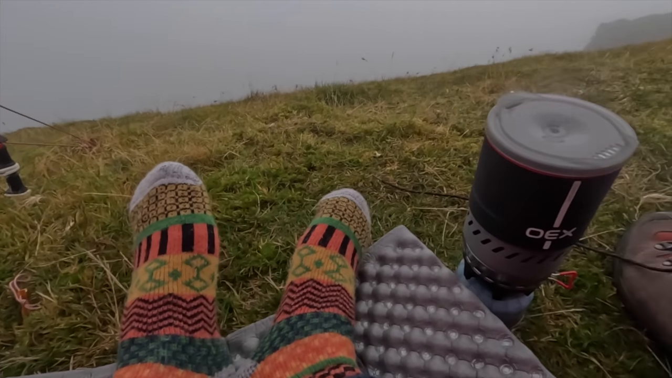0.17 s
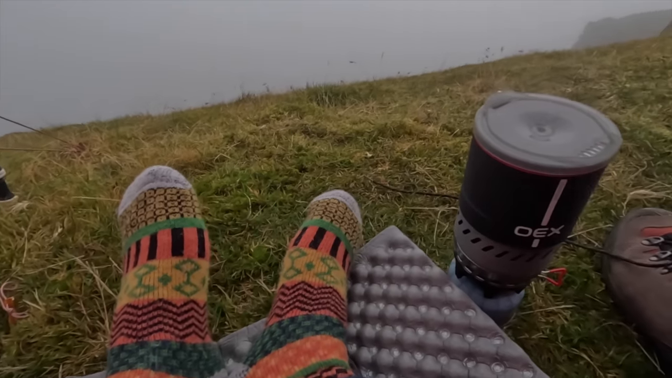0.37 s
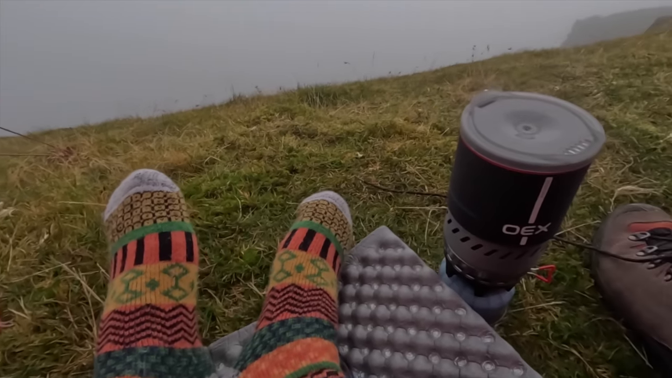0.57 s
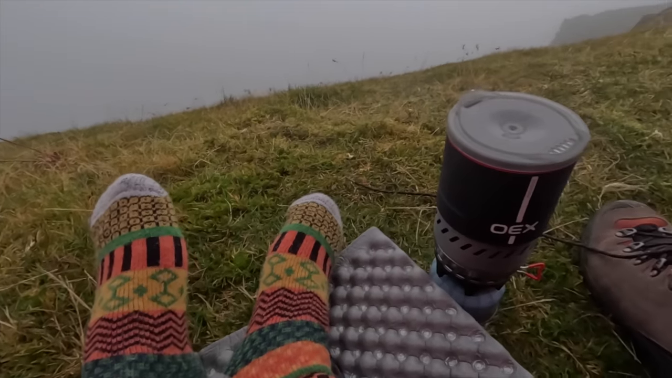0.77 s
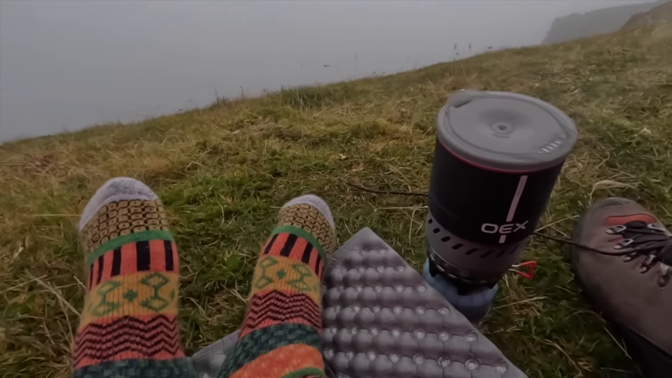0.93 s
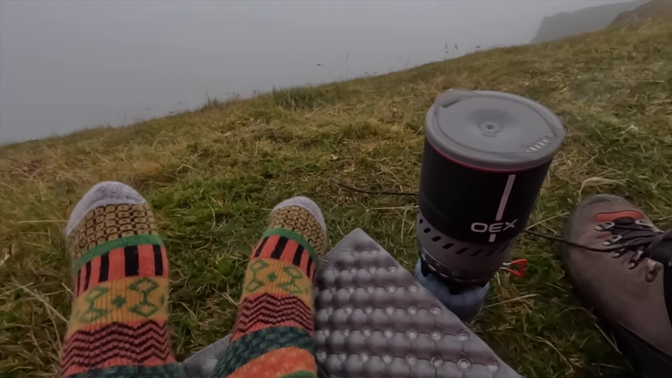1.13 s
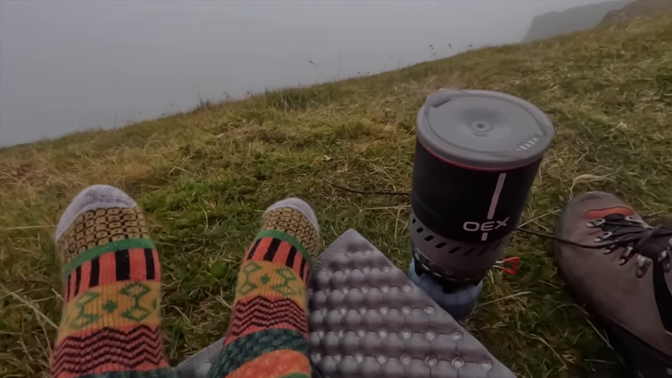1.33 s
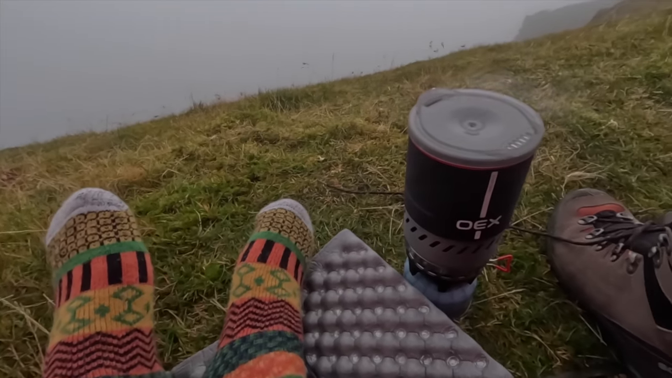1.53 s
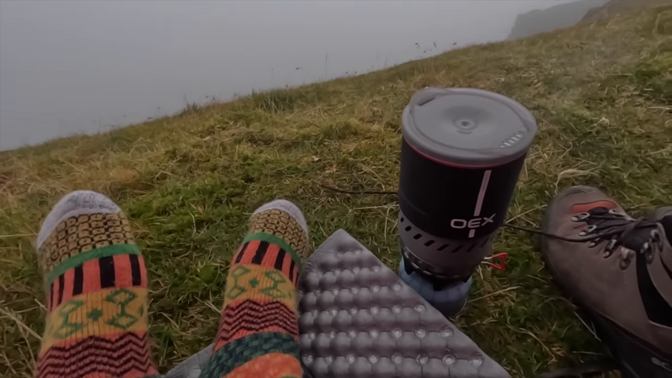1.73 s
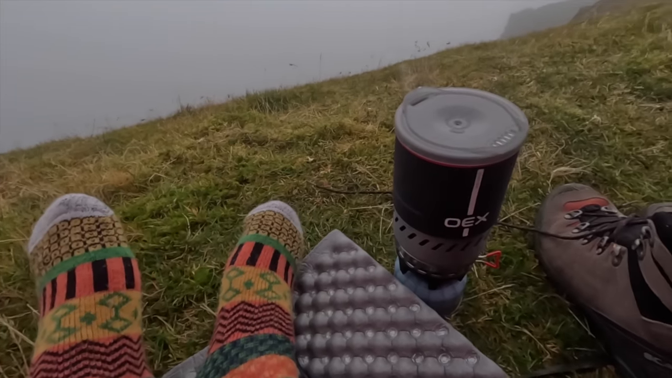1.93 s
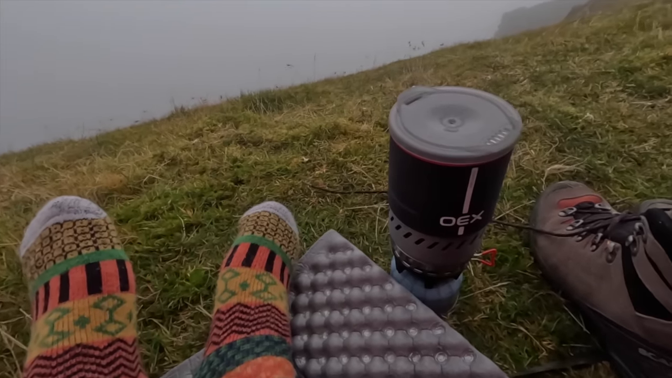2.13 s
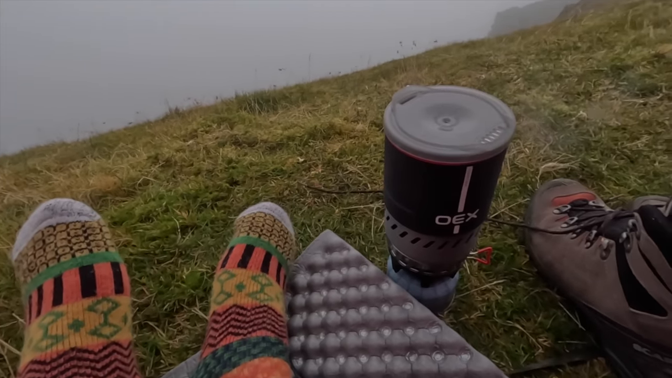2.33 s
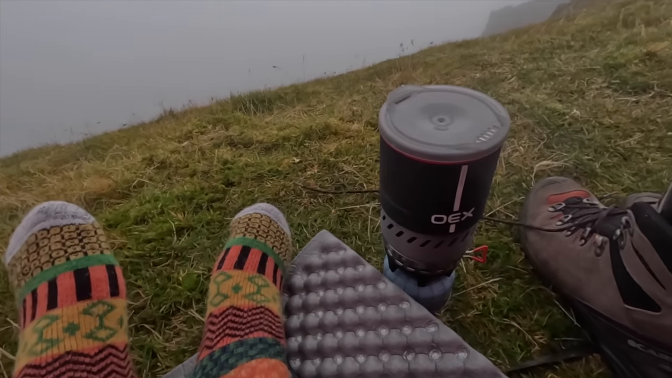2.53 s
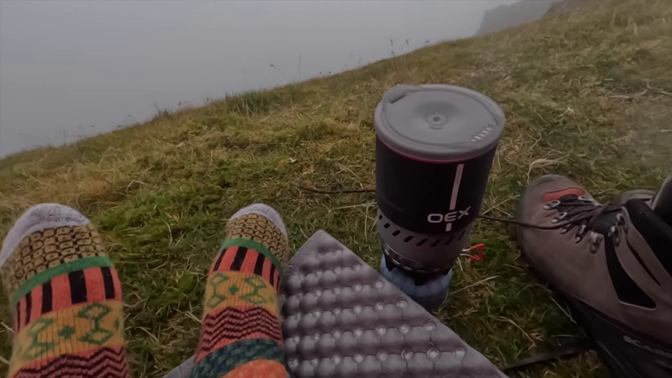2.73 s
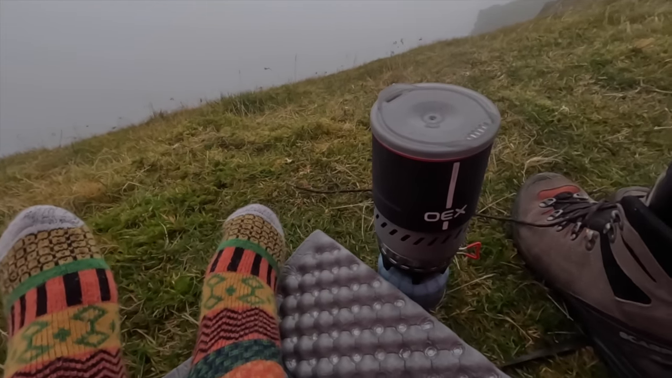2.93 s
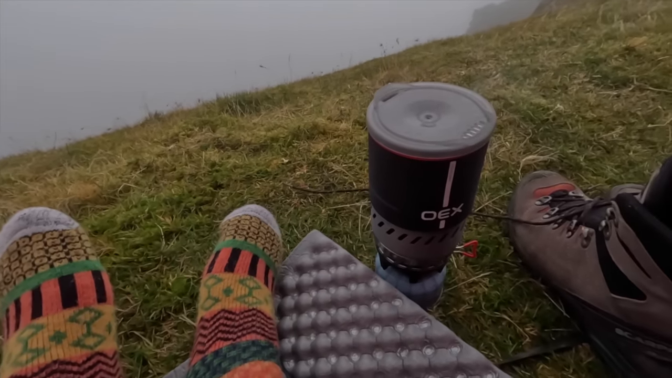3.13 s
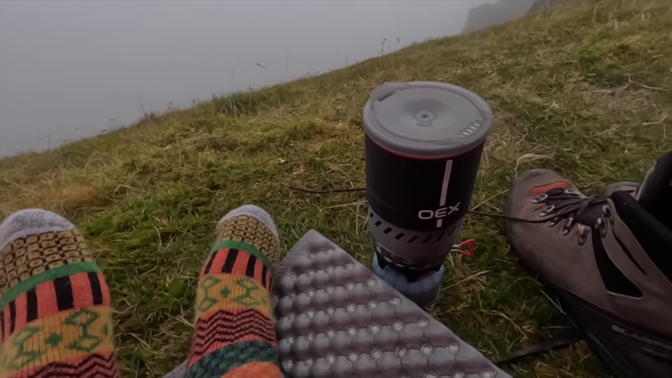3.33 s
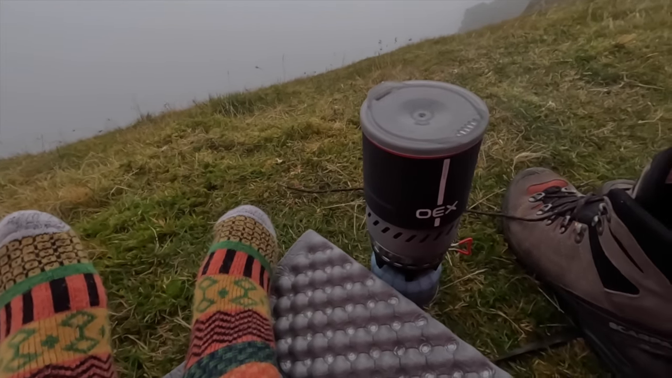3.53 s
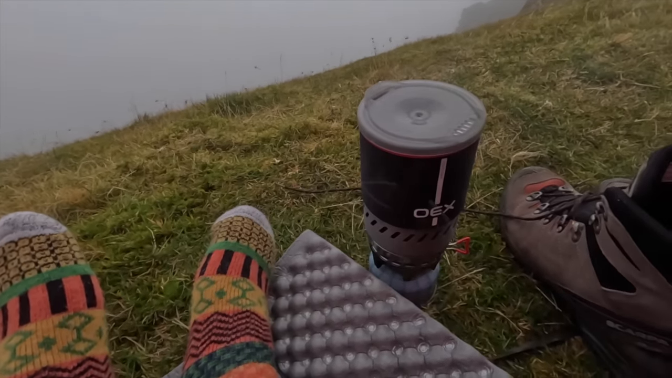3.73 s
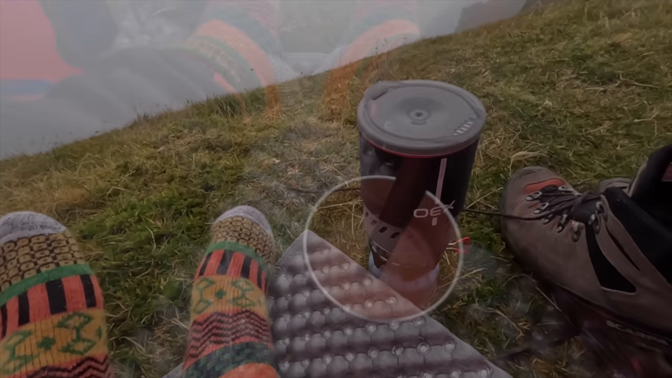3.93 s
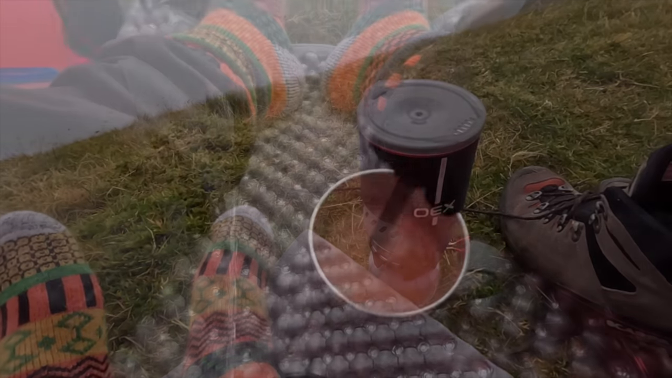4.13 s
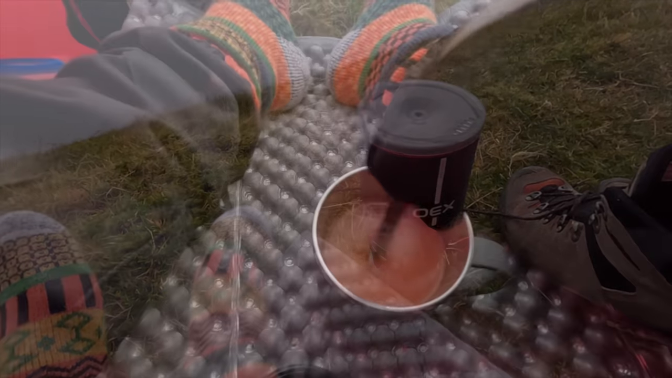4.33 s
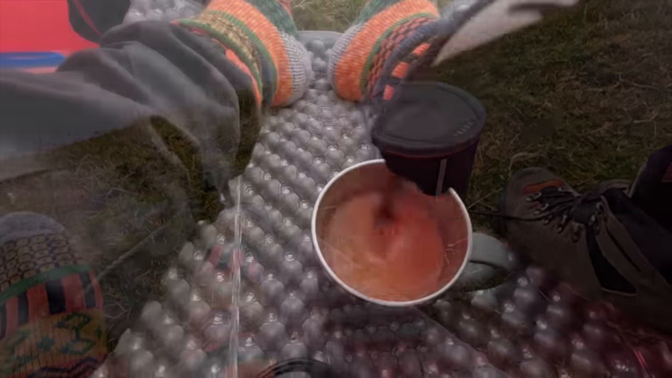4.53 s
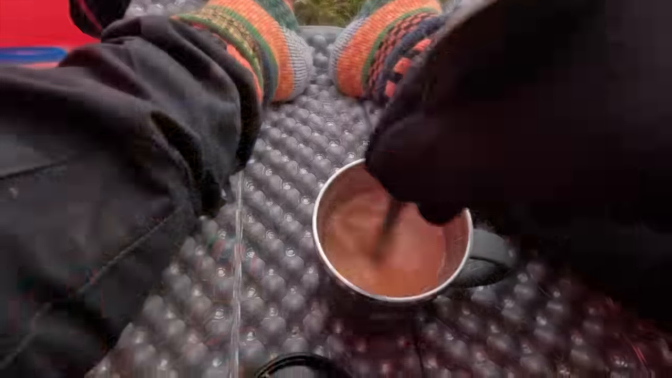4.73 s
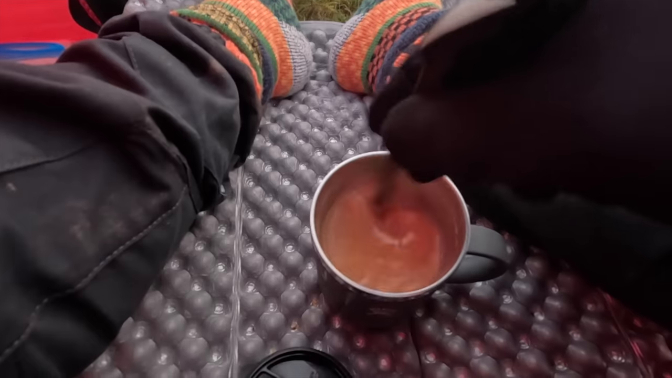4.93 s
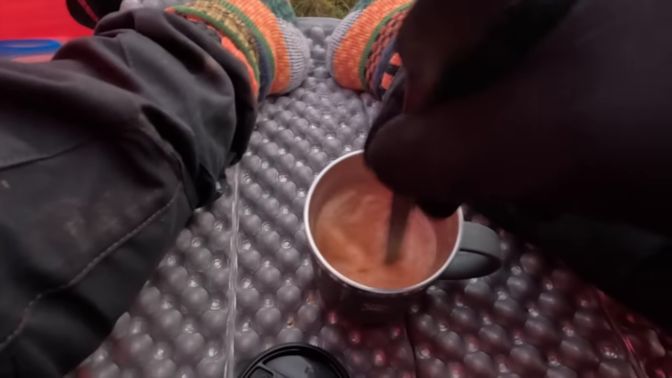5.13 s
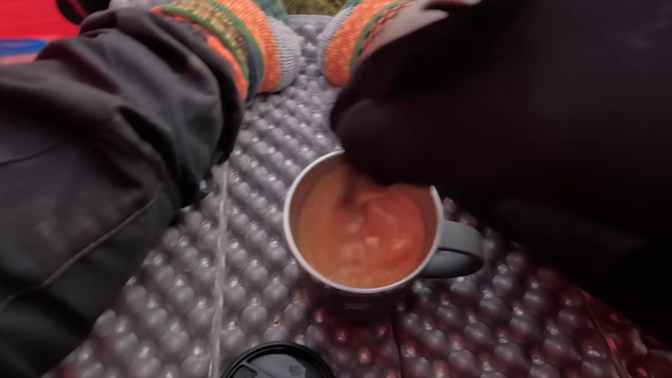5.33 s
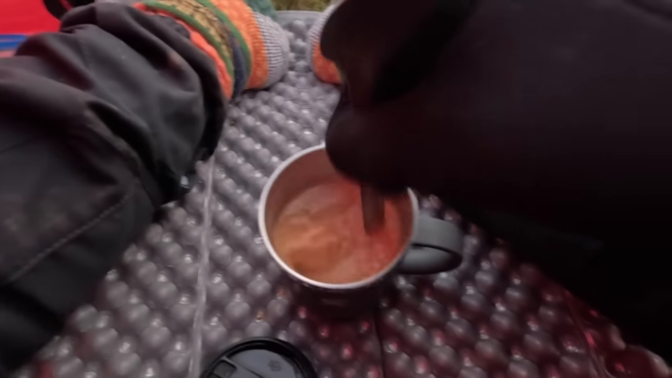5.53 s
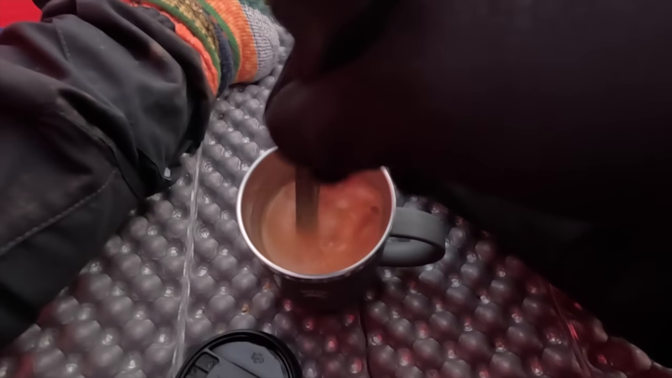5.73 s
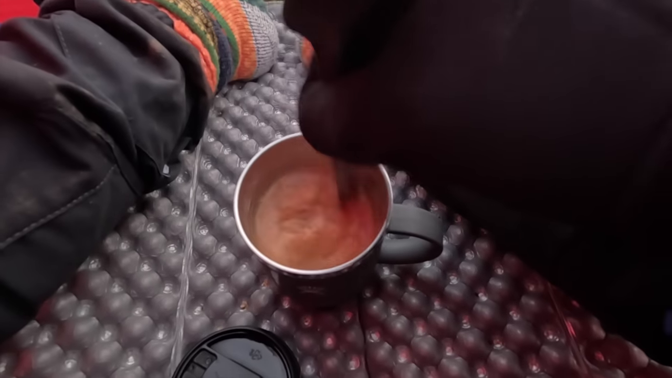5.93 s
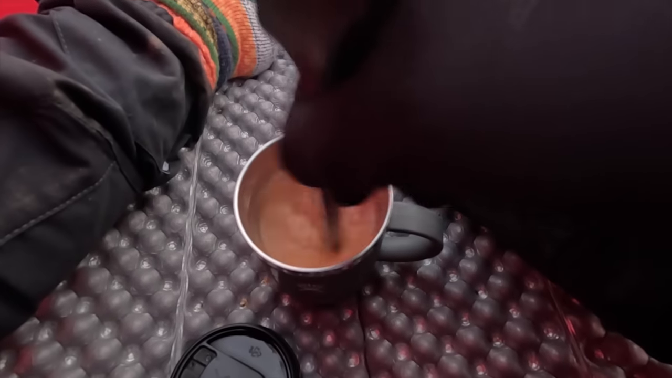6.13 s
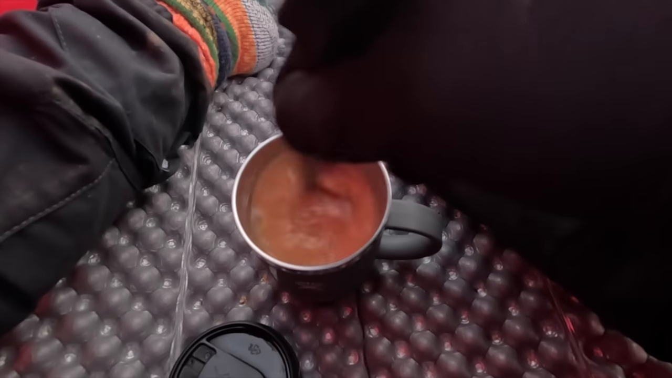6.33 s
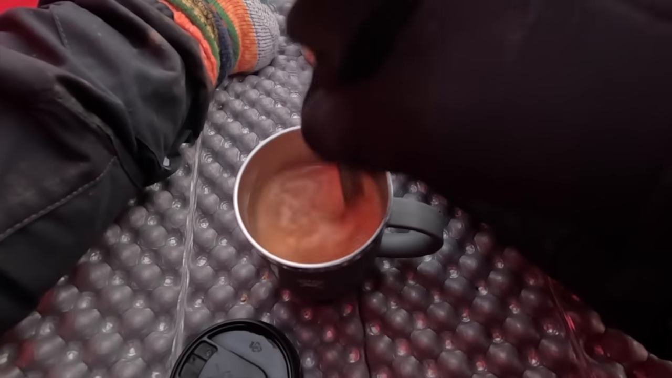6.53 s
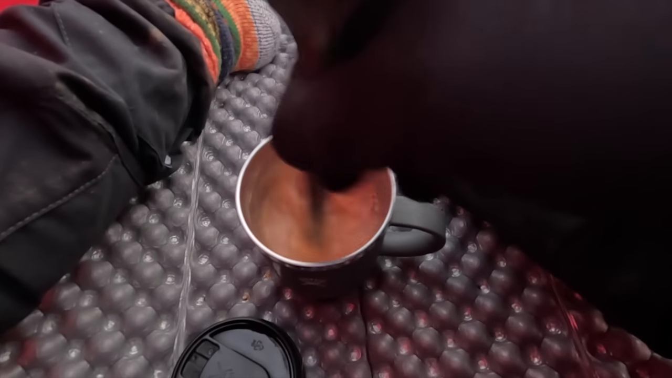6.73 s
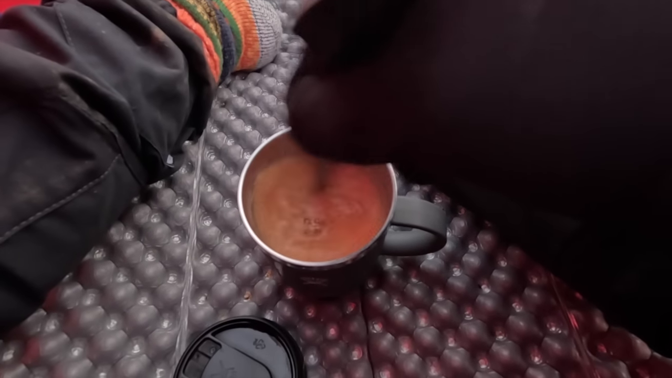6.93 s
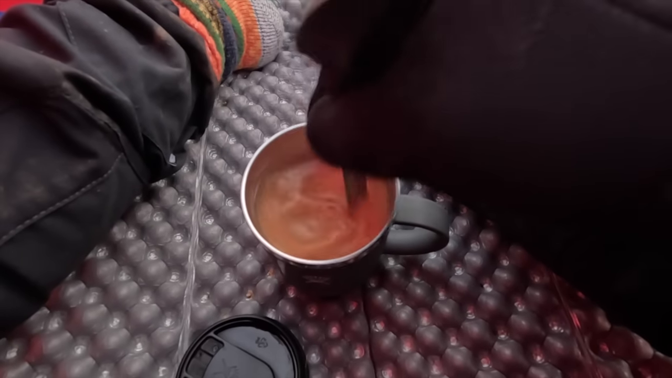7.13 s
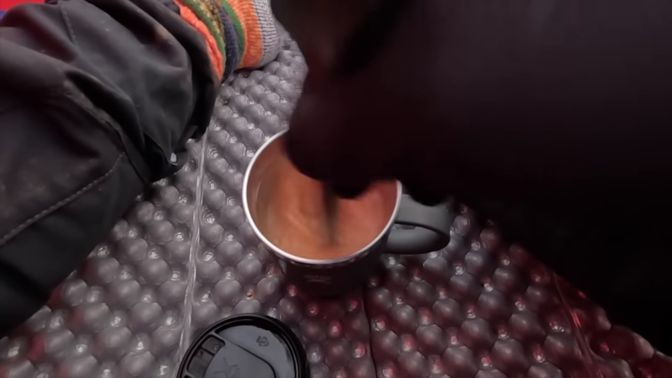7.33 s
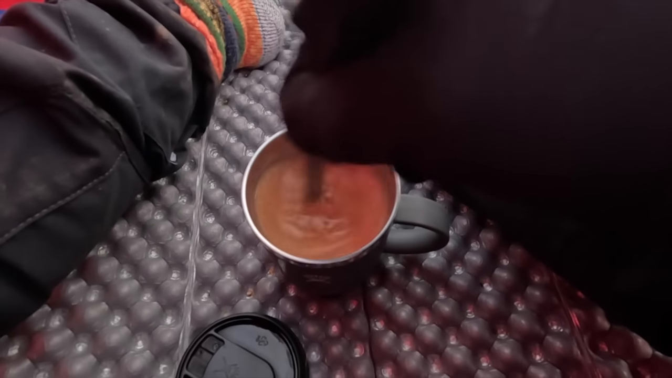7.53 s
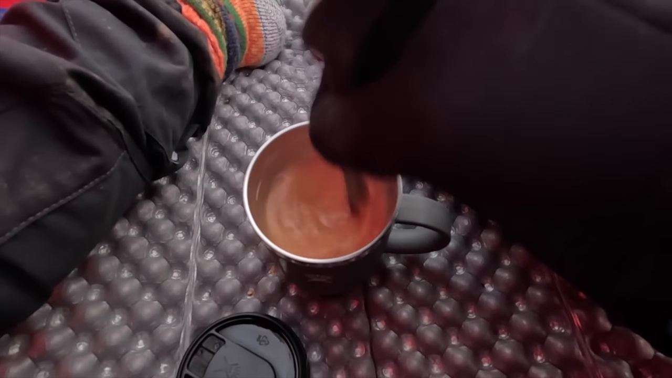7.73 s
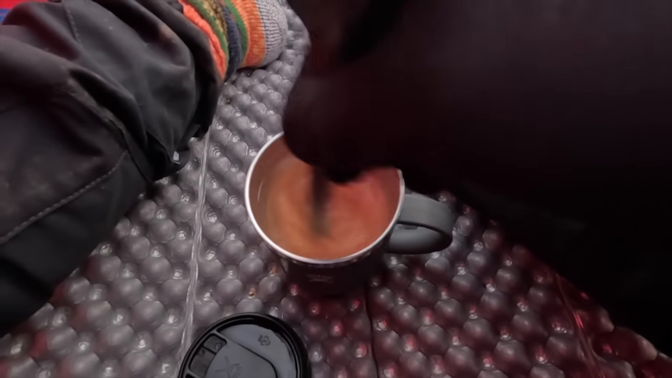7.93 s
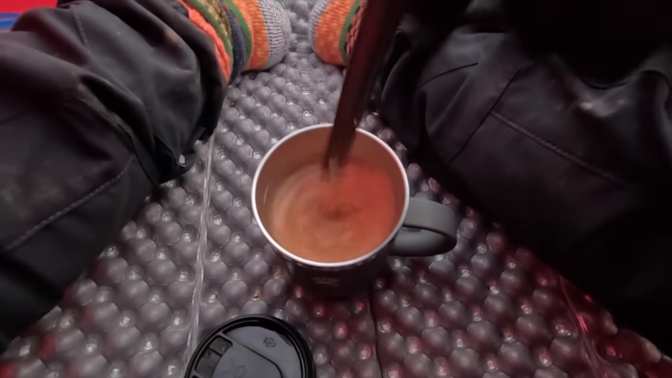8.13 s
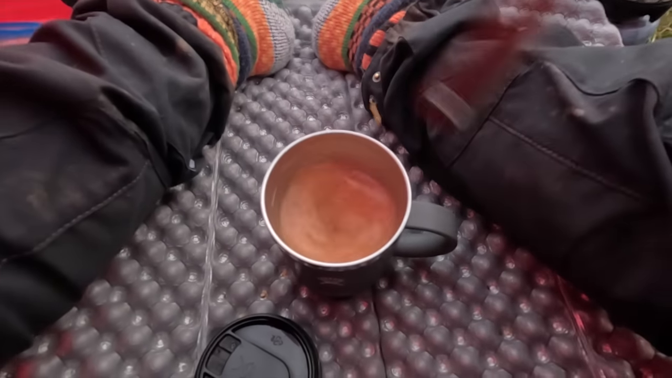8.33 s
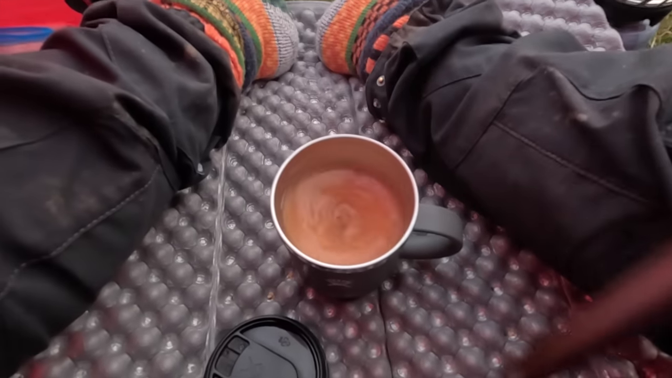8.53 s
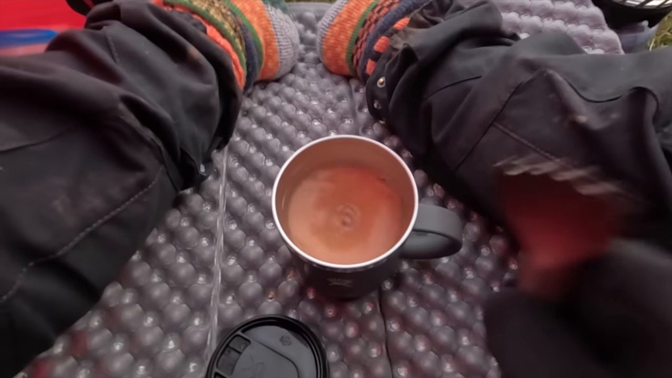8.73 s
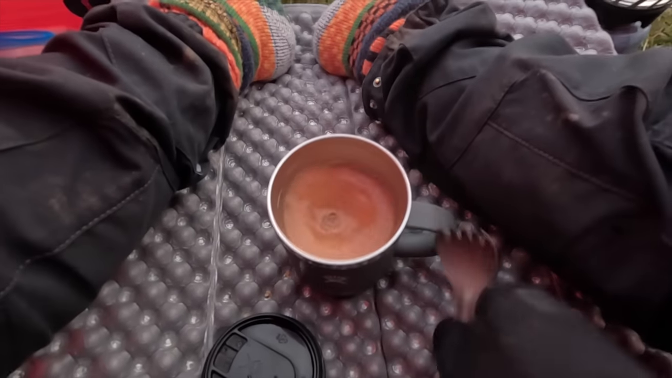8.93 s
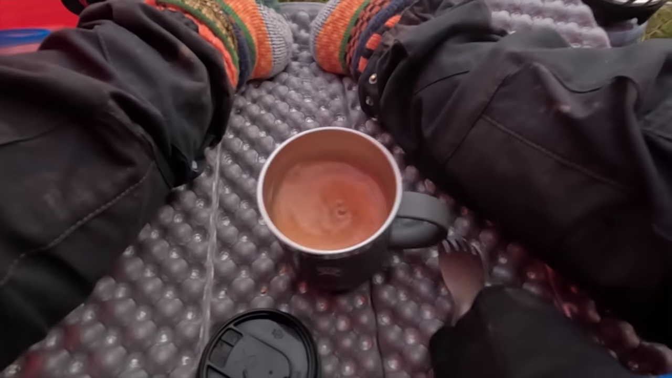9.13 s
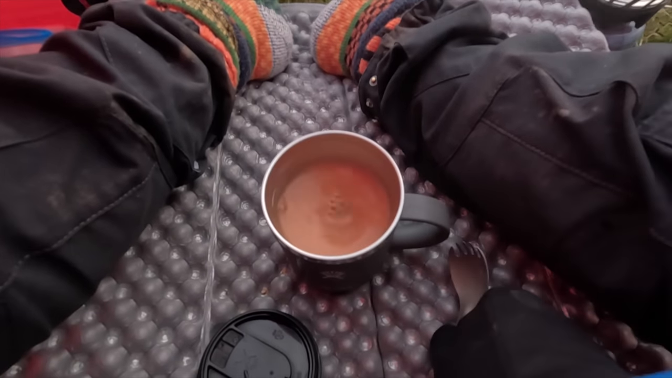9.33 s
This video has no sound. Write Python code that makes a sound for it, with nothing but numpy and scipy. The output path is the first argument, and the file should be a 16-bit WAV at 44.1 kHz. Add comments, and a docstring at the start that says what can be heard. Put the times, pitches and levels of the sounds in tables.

```python
"""First, on a windy hill, a small gas burner roars and hisses under a pot while gusts hit the microphone.
After four seconds this fades into a spoon stirring a drink in a steel mug. Each stroke hits the wall,
makes it ring and scrapes along it. Small ticks and drips fall between the strokes, and a sleeve rustles.
Near the end the arm draws away, and the spoon knocks twice on something dull and slides off over a mat."""
import sys
import numpy as np
from scipy import signal
from scipy.fft import rfft, irfft, next_fast_len
from scipy.io import wavfile
from scipy.ndimage import uniform_filter1d

SR = 44100
rng = np.random.default_rng(int(sys.argv[2]) if len(sys.argv) > 2 else 0)


def transcribe(u):
    """Save the signal u as a 16-bit wav file named by the first command-line argument.

    u: samples, shape (n,) or (channels, n), limited to [-1, 1]; the rate is SR.
    q: integer samples, one column per channel.
    """
    v = np.clip(np.atleast_2d(u).T, -1, 1)
    q = np.round(v * 32767).astype(np.int16)
    wavfile.write(sys.argv[1], SR, q)


N = 418509

# Levels are relative. A tilt makes a sound brighter (above 0) or duller (below 0).
# The tones the mug wall rings with: pitch_hz, level_db, ring_s (time to fade by 60 dB)
MUG_TONES = [(1006, -23.5, 0.3), (1330, -16, .15), (1960, -34.5, 1), (2246, -16.5, 0.33), (2570, -17, 0.5),
             (2750, -12, 0.15), (2750, -20.5, 0.49), (3170, -13.5, 0.5), (3300, -8.5, 0.072),
             (3950, -5.5, 0.23), (4530, -11, 0.38), (4750, -7, 0.057), (4870, -9, 0.34), (5250, -17, 0.13),
             (5640, -6, 0.22), (5740, -16, 0.57), (6050, -14, 0.36), (6340, -4.5, 0.21), (6700, -12, 0.33),
             (6730, -17, 0.18), (7120, -2.5, 0.088), (7500, -13.5, 0.091), (7850, -7, 0.14),
             (8300, -11.5, 0.11), (8830, -6, 0.065), (9600, -9.5, 0.19), (10020, -13.5, 0.1),
             (10600, -36, 0.11), (11200, -20.5, .1)]
# The spoon hits the wall; each spot favours one pitch: start_s, level_db, tilt_db_per_octave, spot_hz
STRIKES = [(4.6193, -21.5, -1.5, 3030), (4.953, -17.5, -4, 5920), (4.989, -20, -4.5, 3200),
           (5.2, -42, -17, 2500), (5.3493, -17, -4.5, 3230), (5.56, -33.5, -19, 4000),
           (5.6242, -17.5, 2.5, 7500), (5.94, -17, 0, 6020), (6.1912, -18, -1, 3010),
           (6.5556, -13, 3.5, 7550), (6.5697, -31, -18.5, 4600), (7.226, -18.5, -4.5, 6820),
           (7.415, -23.5, 5, 10300), (7.44, -16, -4, 4260), (7.7036, -13, -7, 7400),
           (7.7506, -19, -5.5, 5030)]
# The spoon scrapes along the wall: start_s, level_db, rise_s, hold_s, tilt_db_per_octave
SCRAPES = [(4.622, -29, .004, .005, -1.5), (4.953, -22, 0.0029, 0.021, -4), (5.349, -28, 0.003, 0.016, -3),
           (5.626, -21.5, .004, 0.057, -4), (5.944, -26, 0.0033, 0.08, 0), (6.196, -25.5, 0.031, 0.11, 2.5),
           (6.559, -24, 0.0037, 0.08, 1), (7.227, -32.5, 0.003, 0.012, 3.5), (7.415, -32, .004, .006, 4),
           (7.442, -33, 0.0034, 0.038, 4.5), (7.705, -29.5, 0.0023, 0.014, 5.5),
           (7.751, -37, 0.0029, 0.0066, -0.5)]
# The noise of a scratch or snap: pitch_hz, level_db
SCRATCH_SPECTRUM = [(410, -29), (700, -21.5), (1330, -4), (1840, -7), (3940, -0.5), (7890, -12),
                    (14200, -25), (16000, -43)]
# The two last knocks: start_s, level_db, tilt_db_per_octave, spot_hz
KNOCKS = [(8.989, -16.5, -1, 4710), (9.034, -17.5, -5, 533.6)]
# The tones of the dull thing under the spoon: pitch_hz, level_db, ring_s
DULL_TONES = [(121, -13.5, 0.025), (275, -18, 0.024), (560.4, -12, 0.075), (1050, 4, 0.0079),
              (3270, 5.5, 0.01), (4380, 3.5, 0.013), (7600, 2, 0.018)]
# Small ticks and drips: start_s, level_db, pitch_hz, ring_cycles
TICKS = [(4.078, -27.5, 1410, 8.2), (4.528, -28, 680, 4.9), (4.99, -23, 1360, 11), (5.02, -36, 1400, 10),
         (5.081, -46, 1450, 34), (5.191, -35, 3860, 11), (5.2, -31.5, 2430, 23), (5.206, -37, 1440, 36),
         (5.518, -20, 3900, 6), (5.56, -27.5, 1220, 25), (5.888, -28.5, 4660, 8.7), (5.9, -30, 6700, 7.3),
         (6.806, -34, 4450, 23), (6.845, -43, 6500, 8), (6.866, -39, 6500, 8), (7.124, -23.5, 3300, 13.4),
         (7.387, -36, 7500, 17), (7.831, -25.5, 7960, 4.9), (8.071, -41, 1350, 56), (8.113, -40, 3300, 26),
         (8.519, -30.5, 1030, 4.4), (8.855, -29.5, 265, 14), (9.119, -18, 950, 4.5),
         (9.269, -19.5, 550, 3.6), (9.302, -34, 2500, 5), (9.328, -25.5, 1150, 4.1), (9.347, -36, 2290, 5),
         (9.419, -40, 8500, 5.2)]
# The spoon rubbing on the mat: pitch_hz, level_db
MAT_SPECTRUM = [(1000, -17), (3300, 10), (8000, -23)]
# How loud the burner is: time_s, level_db
BURNER_LEVELS = [(0.0, -47), (2.35, -46), (4.1, -49)]
# The flame's roar and the gas jet's hiss: pitch_hz, level_db
FLAME_SPECTRUM = [(41, -28), (70, 1), (224, -2), (330, 0.5), (375, -4), (449, -5.5), (562, -7.5),
                  (800, -29.5), (900, -28), (1170, -35), (1980, -120)]
JET_SPECTRUM = [(470, -28), (800, -13.5), (1320, 5.5), (1610, -4), (2410, -4), (3650, -3.5), (5580, -7),
                (6250, -12.5), (7080, -13), (7730, -15.5), (9690, -18.5), (14100, -40.5), (16000, -64)]
# Pitches that the burner and the pot's skirt boost: pitch_hz, width_hz, lift_db
JET_PEAKS = [(1350, 280, -2.5), (1830, 170, 3.5), (2480, 540, 4), (3610, 76, 5.5), (5590, 150, 4),
             (6980, 170, 5.5), (8900, 260, 3)]
# How hard the wind hits the microphone: time_s, level_db
GUST_LEVELS = [(0, -30), (.48, -41.5), (.56, -27), (.71, -23.5), (.8, -37.5), (.88, -22), (1.0, -40),
               (1.74, -35), (2.05, -43), (2.2, -28), (2.39, -31), (2.46, -23), (2.63, -17.5), (2.9, -36.5),
               (3.36, -32), (4.04, -36.5), (4.14, -32), (4.48, -40.5), (4.58, -53), (6.1, -50), (6.37, -41),
               (6.5, -50), (8.4, -44.5), (8.75, -51), (9.05, -32), (9.2, -42), (9.49, -53.5)]
# The wind's rumble: pitch_hz, level_db
WIND_SPECTRUM = [(6, -14), (14, 5), (27, 6), (60, -3), (110, -13), (200, -22.5), (400, -37), (900, -58)]
# The sleeve as the arm draws away in two moves: time_s, level_db
ARM_LEVELS = [(8.17, -57), (8.25, -48), (8.55, -50), (8.61, -57), (8.68, -51.5), (8.8, -40), (8.97, -37.5),
              (9.04, -32.5), (9.118, -41), (9.135, -46), (9.269, -40.5), (9.285, -58)]
# The sleeve brushes with each turn of the wrist: middle_s, level_db, half_length_s
SWISHES = [(5.211, -57.5, 0.042), (5.57, -56.5, 0.15), (5.79, -60.5, 0.072), (5.926, -57.5, 0.11),
           (6.09, -59, 0.15), (6.426, -58, 0.071), (6.568, -51, 0.095), (6.718, -57.5, 0.092),
           (6.858, -54, 0.056), (7.008, -58, 0.1), (7.148, -56, 0.057), (7.295, -58.5, 0.22),
           (7.578, -56.5, 0.14), (7.912, -54.5, 0.14), (8.049, -51.5, 0.043)]
# Rubbing cloth: pitch_hz, level_db
CLOTH_SPECTRUM = [(150, -28), (300, -8.5), (650, -12.5), (1000, -6), (1350, -1), (1900, -3.5), (3500, -5),
                  (7500, -11), (10000, -18), (14600, -40), (16000, -70)]
# The quiet air around the mug: pitch_hz, level_db
AIR_SPECTRUM = [(35, -23), (60, -11.5), (200, -16.5), (390, -41), (800, -46.5), (1250, -38), (3200, -36.5),
                (6000, -44), (14000, -63.5)]
# How alike a noise is on the left and right: pitch_hz, likeness (1 is the same)
STEREO_LIKENESS = [(25, .5), (60, .58), (110, .72), (200, .86), (400, .95), (1300, .92), (2400, .86),
                   (4400, .93), (8000, .97), (13000, .4)]
# How much louder the left is than the right: pitch_hz, left_over_right_db
STEREO_BALANCE = [(60, -0.5), (180, -1), (550, -2.5), (1650, -3), (4970, -2), (15000, 1)]

FADE_FROM_S, FADE_S = 4.097, 0.62   # the burner scene fades into the mug scene
SLOSH_SHARE, GLIDE_SHARE_PER_S = .012, .08   # the moving drink shifts and bends the mug's pitches
SAG_DB_PER_S = 47   # the spoon presses less as a scrape goes on
LIFT_OFF_S, LIFT_OFF_DB_PER_S, DULLING_DB_PER_OCTAVE_S = 0.13, 339, 49   # then it leaves the wall


def spoon_strikes():
    """The spoon hits the steel wall, and all the mug's tones ring at once."""
    return struck(STRIKES, MUG_TONES, level_db=-21, scatter_db=4.5,
                  detune=SLOSH_SHARE / 2, glide_per_s=GLIDE_SHARE_PER_S)


def spoon_scrapes():
    """The spoon's edge chatters on the steel: tiny bumps ring the wall and make a scratchy noise."""
    level_db, tilt, t = np.full(N, -100.), np.zeros(N), np.arange(N) / SR
    which_scrape = np.full(N, -1)
    for k, (start_s, top_db, rise_s, hold_s, start_tilt) in enumerate(SCRAPES):
        on = (t > start_s) & (t < start_s + rise_s + hold_s + LIFT_OFF_S)
        age_s = t[on] - start_s
        which_scrape[on] = k
        level_db[on] = top_db + contact_db(age_s, rise_s, hold_s, SAG_DB_PER_S, LIFT_OFF_DB_PER_S)
        tilt[on] = start_tilt - DULLING_DB_PER_OCTAVE_S * np.maximum(age_s - rise_s - hold_s, 0)
    chatter = from_db(level_db + 1.2 * drift(60)) * bumps(per_s=1500, spread_db=3.0)
    wall = np.zeros(N)
    splits = rng.normal(0, 1, (len(MUG_TONES), len(SCRAPES), 2))   # a round wall splits each tone in two
    for (hz, tone_db, ring_s), pairs in zip(MUG_TONES, splits):
        strength = from_db(tone_db + tilt * octaves(hz) + 4.0 * drift(14))   # the touching point wanders
        push = chatter * strength * rng.choice([-1, 1], N) / np.sqrt(ring_s * SR)
        for k, ((start_s, *_), pair) in enumerate(zip(SCRAPES, pairs)):
            at = round(start_s * SR)
            part = slice(at, at + SR // 2)
            spot_hz = min(STRIKES, key=lambda hit: abs(hit[0] - start_s))[3]   # starts where the hit fell
            own_push = push[part] * (which_scrape[part] == k) * from_db(spot_lift_db(hz, spot_hz))
            for shift in pair:   # the pressed spoon halves the ring time
                wall[part] += ring(own_push, hz * (1 + SLOSH_SHARE * shift), 0.5 * ring_s)
    grit = bumps(per_s=5000, spread_db=2.2)
    scratch = noise(SCRATCH_SPECTRUM, flicker_db=3.0, flicker_hz=40, tilt=tilt, source=grit)
    return wall + from_db(level_db - 17.5) * scratch


def spoon_knocks():
    """The spoon knocks twice on something dull, whose tones die almost at once."""
    return struck(KNOCKS, DULL_TONES, level_db=-5.5, scatter_db=3.5, detune=SLOSH_SHARE, glide_per_s=0)


def ticks():
    """Each tick rings briefly and rises in pitch, like a small bubble near the surface."""
    out, t = np.zeros(N), np.arange(2000) / SR
    for start_s, level_db, hz, cycles in TICKS:
        age = t * hz / np.clip(cycles, 1, 40)   # 1 when the ring has died
        shape = (1 - np.exp(-t * hz * 1.9)) * from_db(-60 * age)
        tone = np.sin(2 * np.pi * hz * t * (1 + 0.033 * age))
        at = round(start_s * SR)
        out[at:at + len(t)] += from_db(level_db + 3.5) * shape * tone
    return out


def snaps():
    """Every strike, knock and tick begins with a short snap of noise."""
    loudness = np.zeros(N)
    for events, snap_db, fade_s in (STRIKES, -5.5, 0.021), (KNOCKS, -0.5, 0.021), (TICKS, -18, 0.012):
        clicks = np.zeros(N)
        for start_s, level_db, *_ in events:
            clicks[round(start_s * SR)] = from_db(level_db + snap_db)
        softened = signal.lfilter([.1], [1, -.9], clicks + 1e-18)
        loudness += signal.lfilter([1], [1, -from_db(-60 / (fade_s * SR))], softened)
    return loudness * noise(SCRATCH_SPECTRUM, flicker_db=1.0, flicker_hz=120)


def spoon_slide():
    """The spoon rubs over a dimpled foam mat, speeding up and then stopping short."""
    age_s = np.arange(N) / SR - 9.13
    shape_db = contact_db(age_s, rise_s=0.113, hold_s=0.0089, sag_db_per_s=0, stop_db_per_s=1506)
    return from_db(shape_db - 34.5) * noise(MAT_SPECTRUM, flicker_db=2.5, flicker_hz=30)


def burner():
    """The flame roars and the gas jet hisses until the first scene has faded."""
    flame = from_db(8.5) * noise(FLAME_SPECTRUM, flicker_db=1.0, flicker_hz=11.3)
    jet = noise(JET_SPECTRUM, flicker_db=1.07, flicker_hz=25.5, peaks=JET_PEAKS)
    return from_db(over_time(BURNER_LEVELS)) * first_scene_share() ** 1.7 * (flame + jet)


def wind():
    """Small swirls of air slap the microphone's openings; stronger gusts sound brighter."""
    gust_db = over_time(GUST_LEVELS)
    swirls = bumps(per_s=350, spread_db=2.5)
    tilt = 0.064 * (gust_db + 36.5)
    rumble = noise(WIND_SPECTRUM, flicker_db=4.0, flicker_hz=10.2, tilt=tilt, source=swirls)
    power = uniform_filter1d(np.mean(rumble ** 2, axis=0), size=SR // 5)
    return from_db(gust_db) * rumble / np.sqrt(power + 1e-12)   # the gust alone sets the level


def sleeve():
    """Synthetic cloth fibres slip over each other in smooth swells of noise."""
    arm_db = over_time([(ARM_LEVELS[0][0] - .1, -100)] + ARM_LEVELS)
    swell, t = from_db(arm_db), np.arange(N) / SR
    for middle_s, level_db, half_s in SWISHES:
        swell += from_db(level_db) * hump((t - middle_s) / half_s)
    tilt = -0.8 - .15 * np.maximum(arm_db + 49.5, 0)   # a heavier rub sounds duller
    slips = np.sqrt(.75 + .25 * bumps(per_s=1500, spread_db=3.0) ** 2)
    return swell * noise(CLOTH_SPECTRUM, flicker_db=2.0, flicker_hz=25, tilt=tilt, source=slips)


def quiet_air():
    """A faint hush comes in with the mug scene."""
    hush = noise(AIR_SPECTRUM, flicker_db=2.5, flicker_hz=8.7)
    return from_db(-56.5) * (1 - first_scene_share()) * hush


def struck(hits, tones, level_db, scatter_db, detune, glide_per_s):
    """Each hit rings every tone, with a slightly random strength, pitch, bend and start."""
    out, t = np.zeros(N + SR), np.arange(SR // 2) / SR
    luck = rng.normal(0, 1, (len(hits), 3, len(tones)))
    delays = rng.integers(0, SR // 1000, (len(hits), len(tones)))   # within the millisecond of contact
    for (start_s, hit_db, tilt, spot_hz), hit_luck, hit_delays in zip(hits, luck, delays):
        for (hz, tone_db, ring_s), strength, shift, bend, delay in zip(tones, *hit_luck, hit_delays):
            colour_db = tone_db + spot_lift_db(hz, spot_hz) + tilt * octaves(hz)
            gain = from_db(level_db + hit_db + colour_db + scatter_db * strength)
            cycles = hz * t * (1 + detune * shift + glide_per_s * bend * t / 2)
            at = round(start_s * SR) + delay
            out[at:at + len(t)] += gain * from_db(-60 * t / ring_s) * np.sin(2 * np.pi * cycles)
    return out[:N]


def spot_lift_db(hz, spot_hz):
    """The tones that move most at the touched spot ring louder."""
    return 11 * np.exp(-(np.log(hz / spot_hz) / .05) ** 2)


def ring(clicks, hz, ring_s):
    """Each click starts a fading tone."""
    decay, step = from_db(-60 / (ring_s * SR)), 2 * np.pi * hz / SR
    return signal.lfilter([0, np.sin(step)], [1, -2 * decay * np.cos(step), decay ** 2], clicks + 1e-18)


def contact_db(age_s, rise_s, hold_s, sag_db_per_s, stop_db_per_s):
    """The level of a rub: it rises, sags while held, then drops away."""
    held_s = age_s - rise_s
    rise_db = 20 * np.log10(np.clip(age_s / rise_s, 1e-5, 1))
    sag_db = sag_db_per_s * np.clip(held_s, 0, hold_s)
    return rise_db - sag_db - stop_db_per_s * np.maximum(held_s - hold_s, 0)


def noise(spectrum, flicker_db, flicker_hz, tilt=0, peaks=(), source=1):
    """Stereo noise shaped by a spectrum (a level for each pitch); its octaves flicker partly together."""
    size = next_fast_len(N)
    hz = np.maximum(np.arange(size // 2 + 1) * SR / size, 1)
    lowest_hz, highest_hz = spectrum[0][0] / 2, spectrum[-1][0] * 2
    mid, side = rfft(rng.standard_normal((2, N)) * source, size)
    alike, lean = at_pitch(STEREO_LIKENESS, hz), from_db(at_pitch(STEREO_BALANCE, hz) / 2)
    shape = from_db(at_pitch(spectrum, hz)) * (hz > lowest_hz)
    for centre_hz, width_hz, lift_db in peaks:
        shape *= from_db(lift_db / (1 + (2 * (hz - centre_hz) / width_hz) ** 2))
    pair = np.sqrt(1 + alike) * mid + np.sqrt(1 - alike) * side * [[1], [-1]]
    pair = shape * pair * [lean, 1 / lean]
    pair /= np.sqrt(np.mean(irfft(pair, size)[:, :N] ** 2))
    out, together = 0, drift(flicker_hz / 4)
    for centre_hz in 16 * 2. ** np.arange(11):
        if lowest_hz < centre_hz < highest_hz:
            band = irfft(pair * hump(np.log2(hz / centre_hz)), size)[:, :N]
            wobble_db = flicker_db * (0.58 * together + drift(flicker_hz))
            out = out + from_db(wobble_db + tilt * octaves(centre_hz)) * band
    return out


def bumps(per_s, spread_db):
    """Tiny pushes of uneven size at random times."""
    sizes = from_db(spread_db * np.minimum(rng.exponential(1, N), 4))
    return unit_level(sizes * (rng.random(N) < per_s / SR))


def drift(rate_hz):
    """A smooth random wobble, about 1 in size."""
    memory = np.exp(-80 * np.pi * rate_hz / SR)   # one step is 40 samples
    steps = rng.standard_normal(N // 40 + 2002)
    slow = signal.lfilter([1], [1, -2 * memory, memory ** 2], steps)[2000:]
    return np.interp(np.arange(N) / 40, np.arange(len(slow)), unit_level(slow))


def first_scene_share():
    """Falls from 1 to 0 during the fade."""
    return np.clip(1 - (np.arange(N) / SR - FADE_FROM_S) / FADE_S, 0, 1)


def octaves(hz):
    """Octaves above 3 kHz, where every tilt pivots; flat above 8 kHz."""
    return np.log2(min(hz, 8000) / 3000)


def hump(x):
    return np.cos(np.clip(x, -1, 1) * np.pi / 2) ** 2


def over_time(rows):
    return np.interp(np.arange(N) / SR, *np.transpose(rows))


def at_pitch(rows, hz):
    pitches_hz, values = np.transpose(rows)
    return np.interp(np.log(hz), np.log(pitches_hz), values)


def from_db(db):
    return 10 ** (np.asarray(db) / 20)


def unit_level(x):
    return x / np.sqrt(np.mean(x ** 2) + 1e-20)


def scene():
    """Add up all the sounds, with the taps a little to the right."""
    taps = (spoon_strikes() + spoon_knocks() + ticks()) * from_db([[-.3], [.3]])
    return taps + sleeve() + spoon_slide() + burner() + wind() + quiet_air() + spoon_scrapes() + snaps()


def record(dry):
    """Cut the highest treble, above about 16 kHz."""
    return signal.sosfilt(signal.cheby2(12, 70, 16300, fs=SR, output="sos"), dry)


dry = scene()
out = record(dry)
transcribe(out)
```